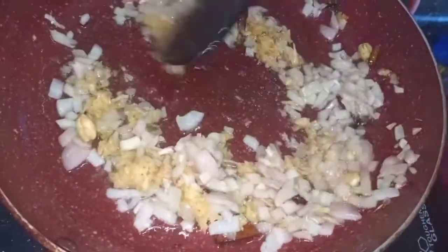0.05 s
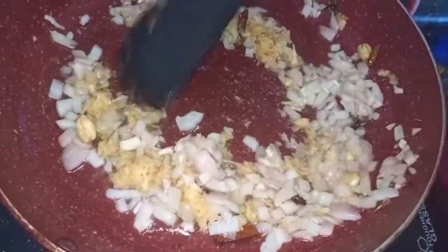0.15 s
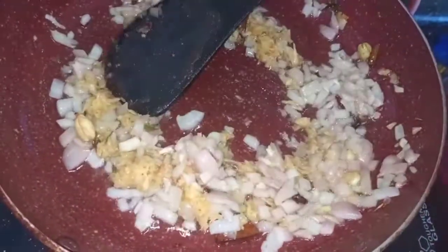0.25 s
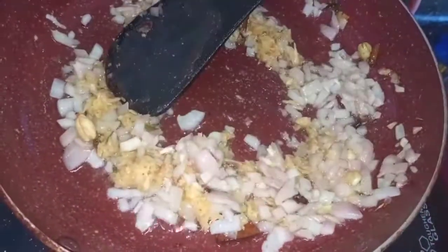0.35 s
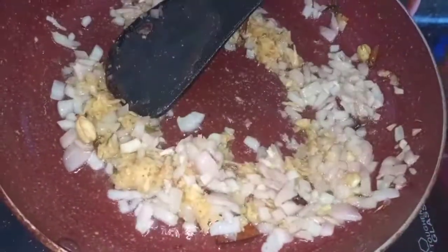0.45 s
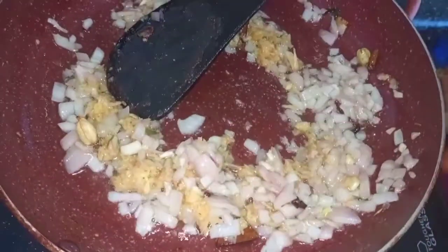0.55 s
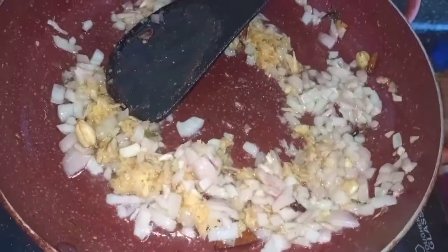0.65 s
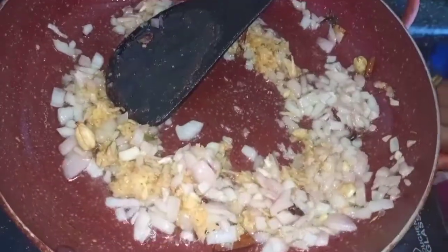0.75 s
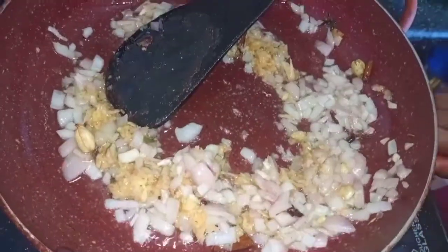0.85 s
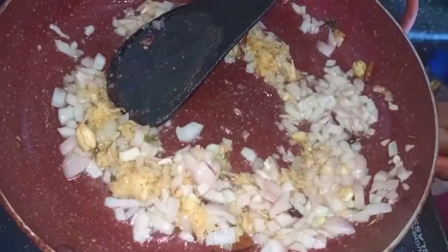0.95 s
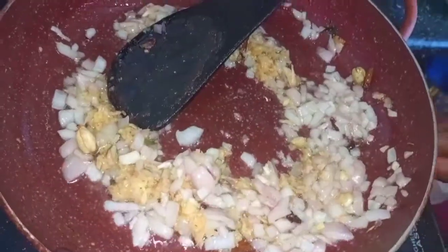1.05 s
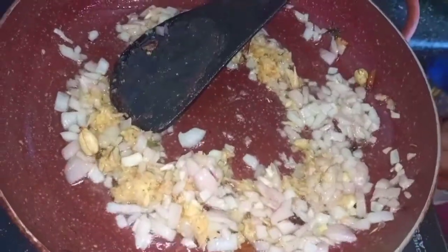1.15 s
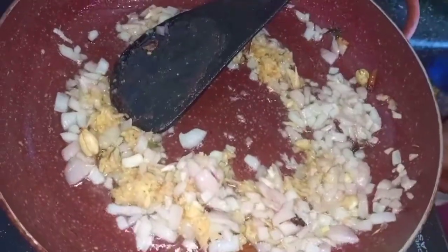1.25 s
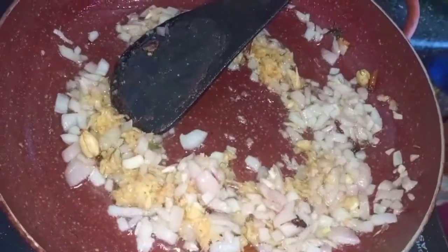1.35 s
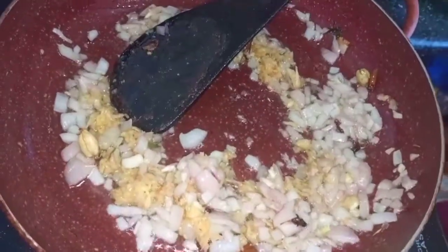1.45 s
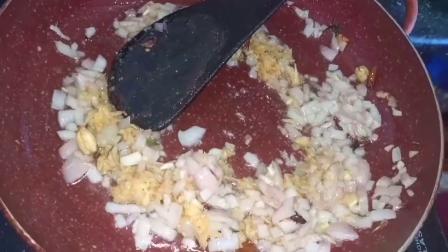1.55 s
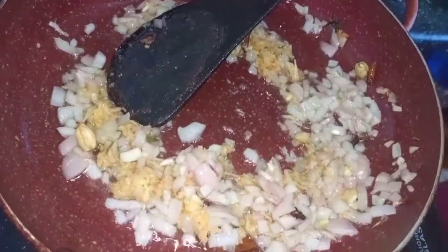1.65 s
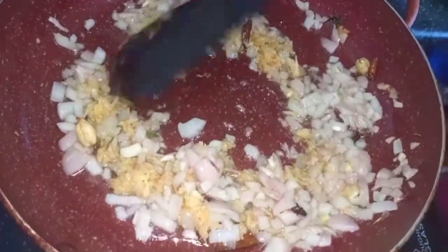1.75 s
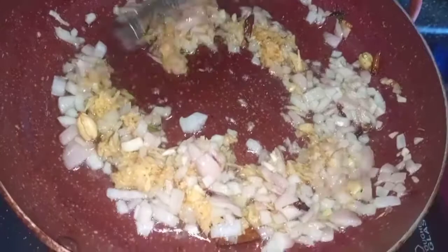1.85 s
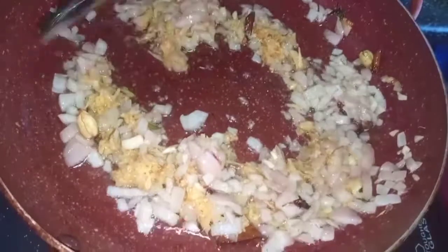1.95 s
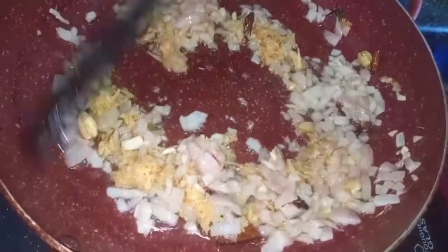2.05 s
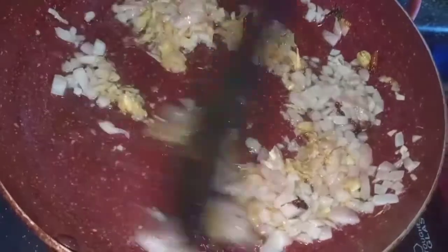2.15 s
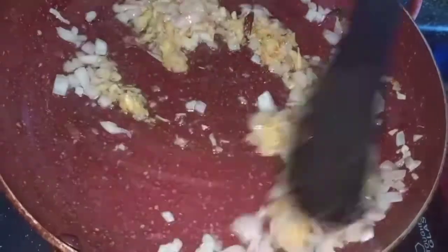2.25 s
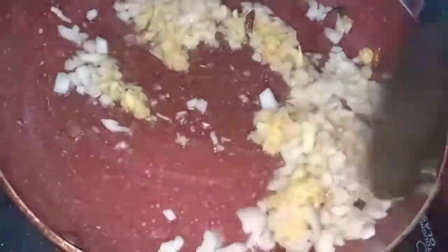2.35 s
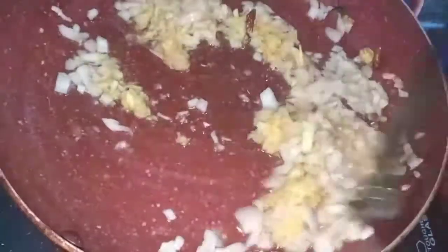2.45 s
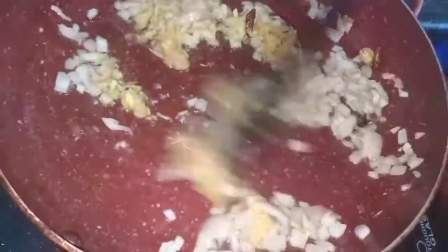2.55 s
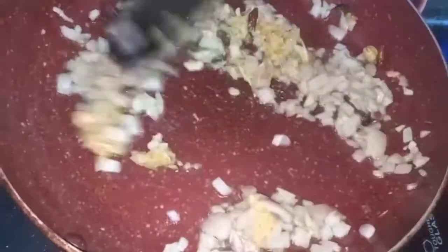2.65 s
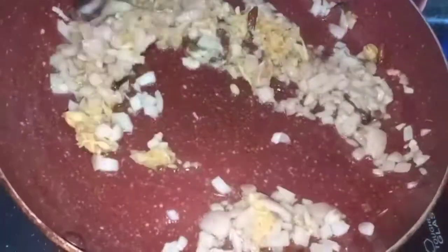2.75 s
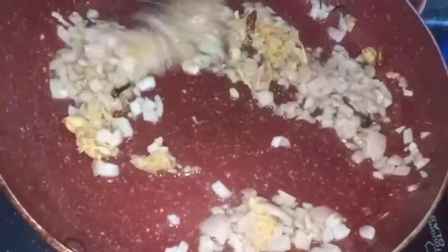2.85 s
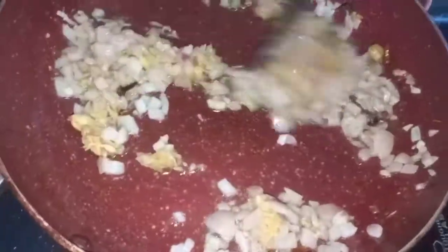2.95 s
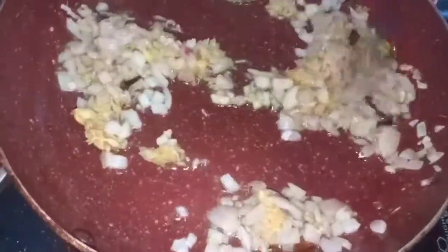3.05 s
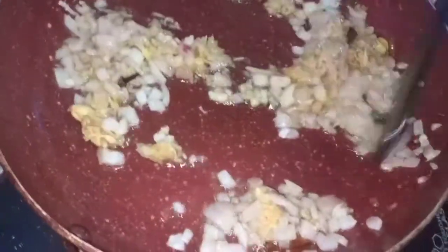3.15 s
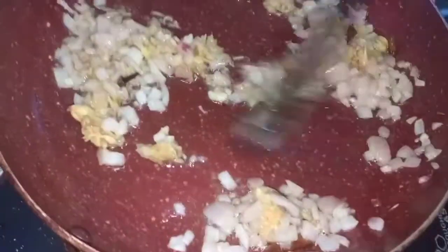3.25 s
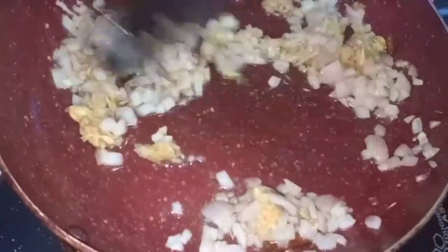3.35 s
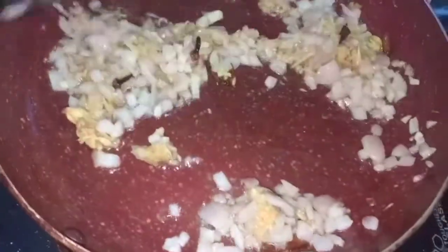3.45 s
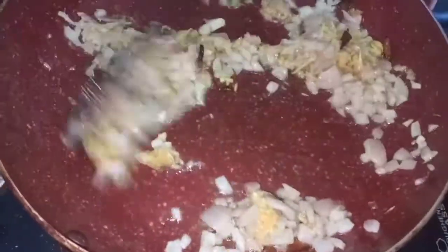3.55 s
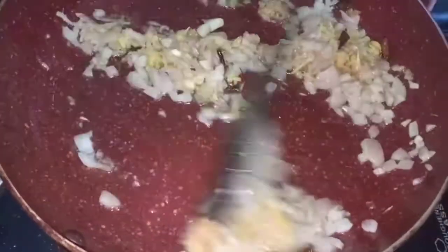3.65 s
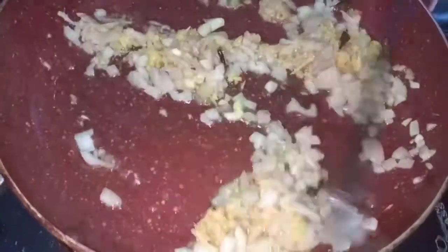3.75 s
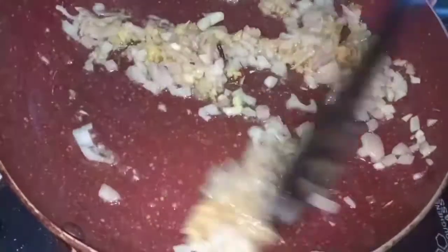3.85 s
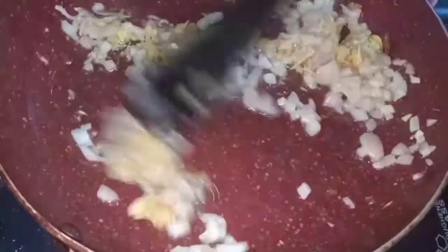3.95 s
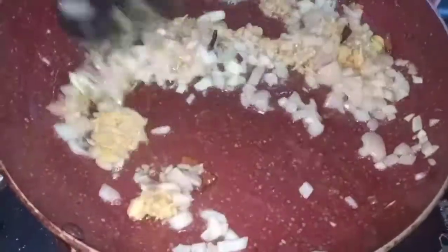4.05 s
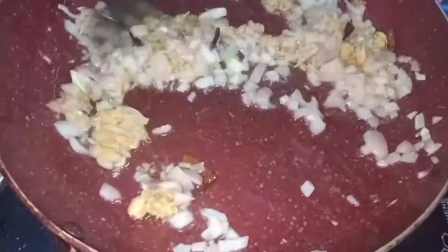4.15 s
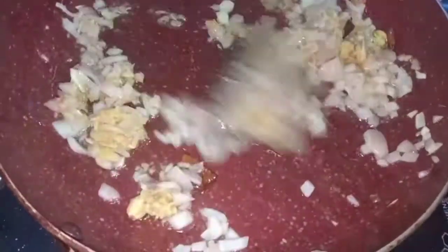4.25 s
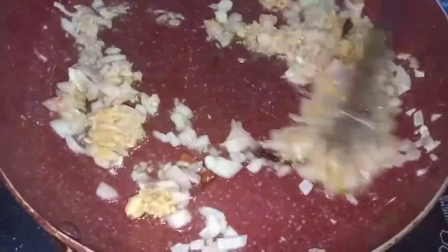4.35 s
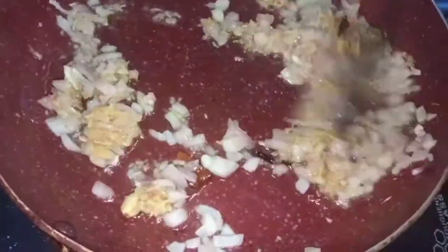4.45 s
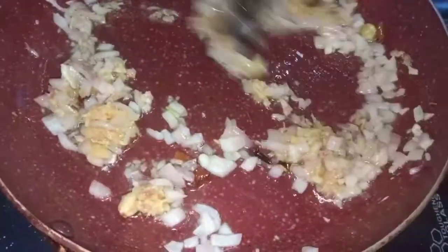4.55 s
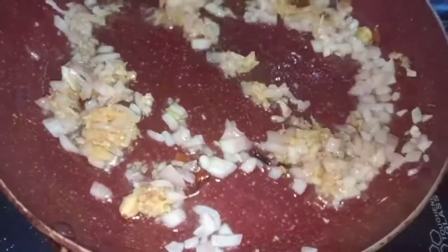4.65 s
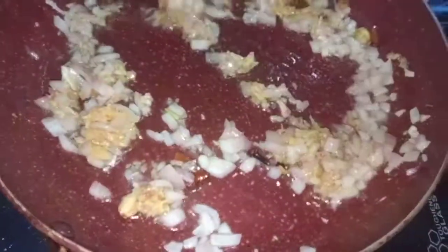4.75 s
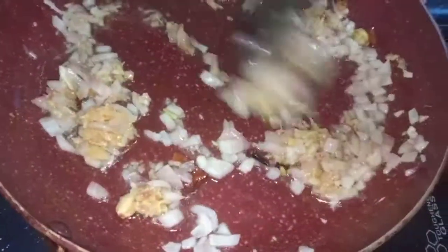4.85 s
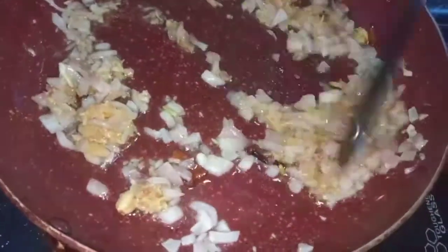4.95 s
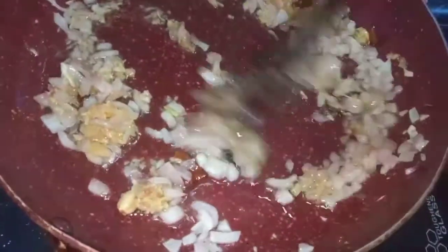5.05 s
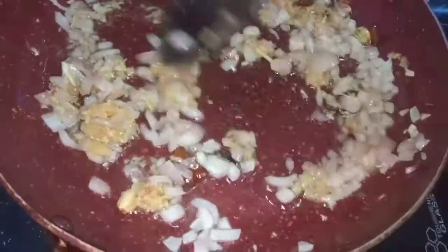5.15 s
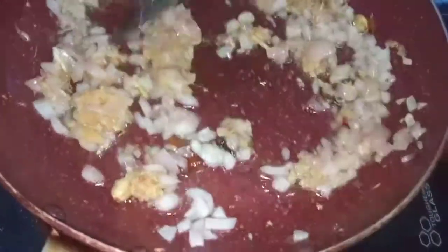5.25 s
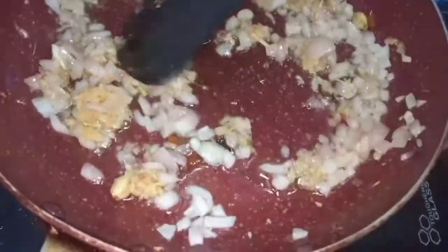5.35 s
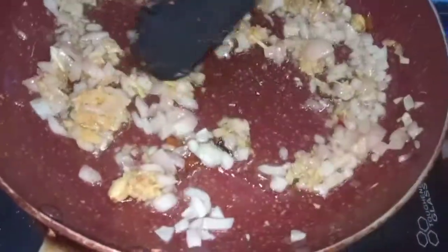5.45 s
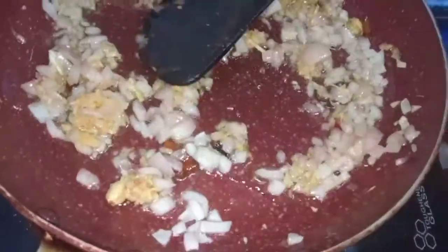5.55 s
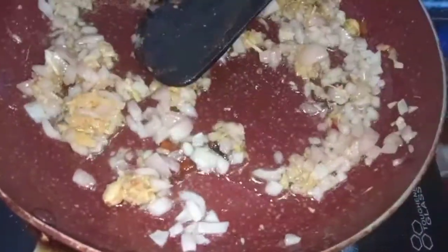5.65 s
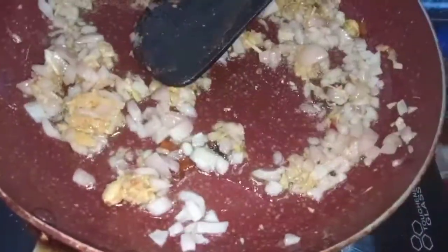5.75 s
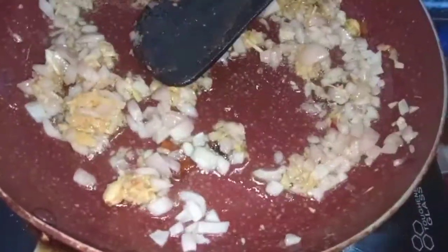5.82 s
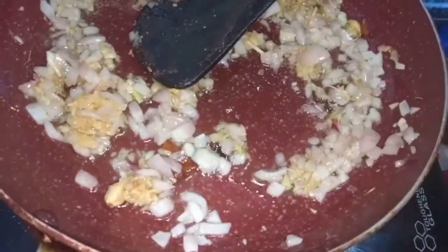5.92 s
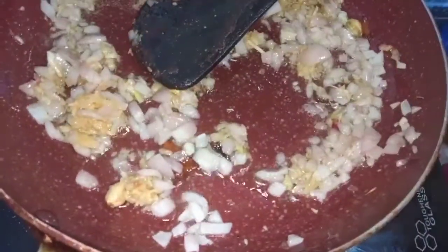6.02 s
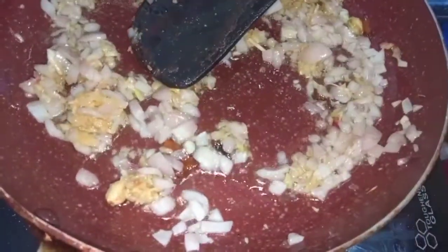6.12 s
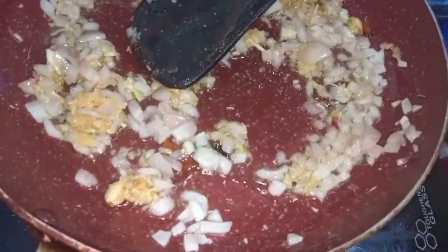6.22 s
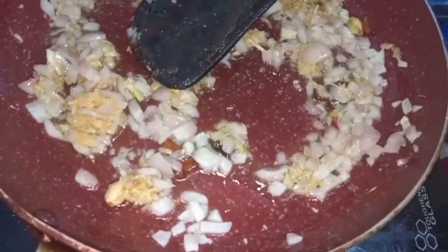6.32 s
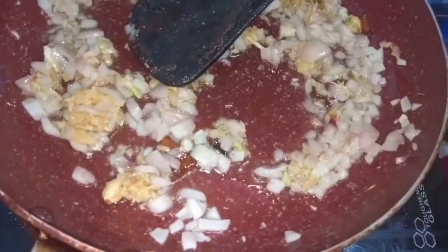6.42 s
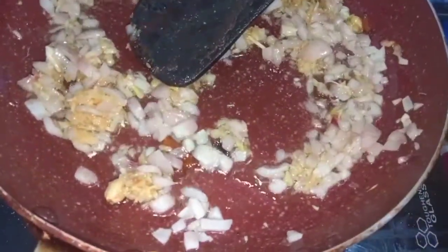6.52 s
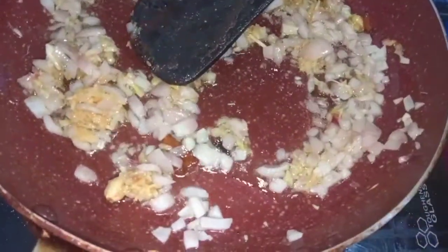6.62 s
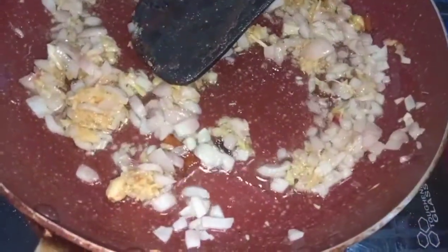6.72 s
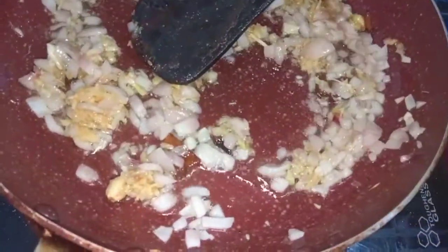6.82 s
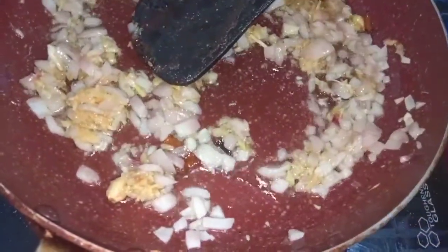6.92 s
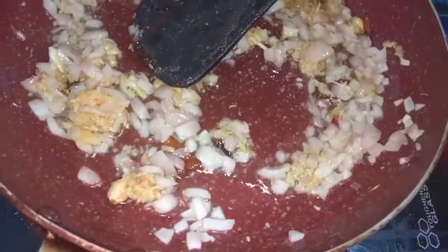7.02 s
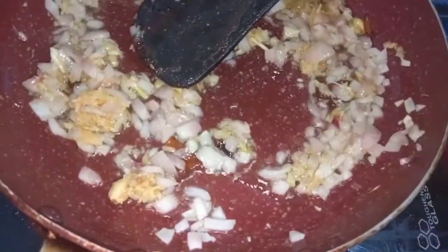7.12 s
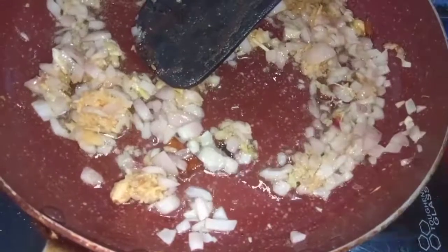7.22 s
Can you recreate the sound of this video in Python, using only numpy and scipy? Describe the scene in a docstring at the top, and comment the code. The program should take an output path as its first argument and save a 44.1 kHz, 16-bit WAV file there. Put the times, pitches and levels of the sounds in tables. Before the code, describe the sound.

A dense, wet crackle of frying runs throughout, its tone shifting as the close microphone moves over the pan. A plastic-sounding spatula raps the pan at the start, pauses, then stirs busily with dull knocks and brief scrapes. Oil drops pop now and then. Later the sizzle turns brighter and a hollow, bouncing utensil clatter breaks in. Small-room reflections, soft stove rumble below.

```python
"""A dense, crackling sizzle over a low stove rumble opens the scene: chopped onion and paste fry in oil.
Random clicks, filtered to follow spectra that change as the microphone shifts, make the bursting bubbles.
A spatula knocks (wave packets, decaying modes), scrapes (swelling noise) and bumps the pan (low swings).
Drops spit as ticks; later a narrow hiss band surges and rises, and near the end a utensil clatters nearby.
A limiter ducks around the hardest knocks and a low-pass removes the extreme treble."""
import sys
import numpy as np
from scipy import signal
from scipy.fft import rfft, irfft
from scipy.io import wavfile
from scipy.ndimage import uniform_filter1d, minimum_filter1d

SR = 44100
rng = np.random.default_rng(int(sys.argv[2]) if len(sys.argv) > 2 else 0)


def persist_wave(psi):
    """Save psi, clipped to +-1, as 16-bit WAV."""
    counts = np.round(np.clip(psi, -1, 1) * 32767).astype(np.int16)
    wavfile.write(sys.argv[1], SR, np.atleast_2d(counts).T)


N = 321224
TIME = np.arange(N) / SR  # s

# Microphone path over the pan: [t/s, position 0-4]
MICROPHONE_PATH = [(0, 0), (2.62, 0), (2.78, 1), (3.2, 1), (3.33, 2), (3.58, 2), (3.72, 3), (4.3, 3),
                   (4.9, 4), (7.28, 4)]
# Frying at positions 0-4: [crackle level/dB and spray level/dB before trims, centre of a small spit f/Hz]
FRYING_AT_POSITION = [(-36.5, -56.5, 1900), (-35.5, -50.5, 3030), (-41, -53, 3200), (-33, -55.5, 1600),
                      (-34.5, -51.5, 4060)]

# Spectra of crackle and fine spray at each position: [f/Hz, relative level/dB per Hz]
CRACKLE_START = [(350, -27), (600, -28), (665, -35), (718, -20), (1060, -19.5), (1160, -18), (1280, -20.5),
                 (1400, -15.5), (1610, -16), (2270, 0), (2780, -11.5), (3130, -10), (3450, -17.5),
                 (3900, -16.5), (4180, -31.5), (4700, -31), (5980, -42), (10100, -120)]
SPRAY_START = [(2820, -41), (4800, -5.5), (5530, -2), (6160, -6), (6700, 0), (7570, -15), (8310, -4.5),
               (9350, -14.5), (10200, -8), (11300, -11), (12200, -19.5), (14900, -21), (15500, -42)]
CRACKLE_SHIFTED = [(290, -29), (500, -33), (624, -50), (681, -29), (1100, -23), (2200, -16), (2800, -8.5),
                   (5000, -25), (6500, -76), (11000, -120)]
SPRAY_SHIFTED = [(2820, -23.5), (4800, 3), (5730, -8), (6930, -2.5), (7800, -11.5), (11300, -7),
                 (15500, -25)]
CRACKLE_TURNED = [(290, -52), (500, -8), (1260, -2), (1440, 0), (2800, 4), (5000, -9), (6500, -43),
                  (11000, -120)]
SPRAY_TURNED = [(2820, -23), (4800, -4), (6540, -9), (6970, -4), (7990, 0), (10200, -13.5), (13200, -12),
                (15500, -24)]
CRACKLE_STIRRING = [(290, -62), (500, -25.5), (991, -18.5), (1080, -20), (1300, -14.5), (3270, -1.5),
                    (4010, -9.5), (5000, -23), (6500, -54), (11000, -120)]
SPRAY_STIRRING = [(2820, -22), (4800, -10.5), (5320, -2.5), (6670, -11), (7390, -9.5), (11400, -7.5),
                  (15500, -27)]
CRACKLE_END = [(290, -27.5), (500, -26.5), (1050, -16.5), (1370, -15), (1540, -12), (1730, -13.5),
               (2020, -4.5), (2300, -4.5), (2430, -6), (2650, -0.5), (2810, 2), (2950, -3.5), (3220, 1),
               (3550, -8.5), (3750, -4.5), (4050, -7.5), (4850, -17.5), (6500, -73), (11000, -120)]
SPRAY_END = [(2820, -16.5), (4800, 0), (5290, -9.5), (5900, -9), (7250, 0.5), (7690, -6), (8560, -12.5),
             (11500, -7.5), (12900, -12), (15500, -24)]
SIZZLE_SPECTRA = [(CRACKLE_START, SPRAY_START), (CRACKLE_SHIFTED, SPRAY_SHIFTED),
                  (CRACKLE_TURNED, SPRAY_TURNED), (CRACKLE_STIRRING, SPRAY_STIRRING),
                  (CRACKLE_END, SPRAY_END)]

# Stirred onion lands on hot metal and the sizzle flares up: [t/s, extra crackle level/dB]
FLARES = [(2.16, 2.5), (2.55, 4.5), (2.87, 5.5), (3.5, 7.5), (3.89, 3.5), (3.97, 4.5), (4.08, 3), (4.52, 4),
          (5.352, 2.5)]
FLARE_RISE_S, FLARE_FALL_S = 0.14, 0.054  # linear rise, exponential time constant
SPRAY_FOLLOWS = 0.61  # share of a flare's dB that reaches the fine spray

# Two bright hiss bands at positions 0-4: [lower band f/Hz, lower band level/dB, top band level/dB]
HISS_BANDS = [(6550, -65.5, -90), (6720, -64, -83), (7940, -60, -60), (6800, -66, -90), (7240, -84, -90)]
TOP_BAND_HZ = 14400
# Hiss band between them, swelling and falling as the microphone starts to move: [t/s, f/Hz, level/dB]
FALLING_HISS = [(0, 10040, -66), (2.64, 10300, -72), (2.82, 10200, -54), (3.02, 9600, -57),
                (3.2, 9300, -73), (3.32, 9100, -80), (3.7, 8550, -90)]
# Brightest crackle band, climbing in pitch as the microphone shifts: [t/s, f/Hz, level/dB]
CLIMBING_CRACKLE = [(2.55, 2200, -59), (2.67, 2230, -41), (2.78, 2600, -33.5), (2.9, 2750, -44),
                    (3.14, 3300, -40), (3.3, 3500, -63)]

# Spectrum of the stove's rumble: [f/Hz, relative level/dB per Hz]
RUMBLE_SPECTRUM = [(26, -62), (45, -25), (66, -12.5), (107, 3.5), (123, -2), (140, -10), (194, -0.5),
                   (252, -18), (306, -13.5), (368, -17), (415, -12), (448, -21), (600, -18), (780, -31),
                   (1320, -120)]
# Rumble at positions 0-4: [level/dB]
RUMBLE_AT_POSITION = [-47.5, -44, -44.5, -46.5, -51.5]

# Spatula on pan: [t/s, crack peak level/dB, crack centre f/Hz, crack resonance width/Hz, crack top f/Hz,
#                  reflection level/dB, thud gain/dB, wall ring gain/dB, blade ring gain/dB]
KNOCKS = [(0.0969, -8.5, 1720, 1560, 3800, -5, -53, -46, -35.5),
          (0.2986, 11.5, 2195, 450, 4000, -5.5, -30, -35, -18.5),
          (0.3775, 1, 2220, 810, 3920, -4, -26.5, -29, -30),
          (1.0953, -20.5, 870, 800, 2600, -12, -43, -59, -54),
          (1.1127, -26.5, 597, 700, 1400, -4, -53, -56, -67),
          (2.1147, 5, 1330, 2070, 2700, -2, -21.5, -31, -22.5),
          (2.901, 11.5, 1550, 2260, 2980, -0.5, -10, -36, -22.5),
          (3.290, -17, 1790, 4450, 4900, -9, -23.5, -34.5, -46),
          (3.297, -9, 940, 2200, 3250, 0.5, -16.5, -51, -40),
          (3.584, -20.5, 800, 1500, 2980, -2, -27.5, -43, -49),
          (3.594, -21, 700, 1300, 3000, -1, -22.5, -48, -50),
          (3.61, -31, 700, 1300, 3000, -5, -35, -41, -53),
          (3.659, -10.5, 2260, 2660, 3220, -2, -37, -37, -49),
          (3.9112, -6.5, 1820, 1490, 2820, -6, -18.5, -20, -45),
          (3.922, -16, 1510, 2400, 2900, -3, -55, -42, -48),
          (3.935, -18, 1900, 2400, 2900, -5, -34, -52, -50),
          (4.242, 7.5, 1300, 2650, 3470, -0.5, -15, -36, -32),
          (5.121, -18.5, 850, 1770, 2990, -9, -24.5, -52, -52)]
EDGE_DB, EDGE_HZ = -36.5, 6200  # bright click of the blade's edge, relative to the crack
# Body of the knock, spreading through stove and worktop: [f/Hz, relative level/dB per Hz]
THUD_SPECTRUM = [(170, -7), (260, -2.5), (340, -2.5), (450, -4.5), (640, -2), (850, -7), (1500, -13),
                 (2500, -36), (6000, -78)]
# Modes of the pan rocking on the stove: [f/Hz, relative level/dB, t60/s]
THUD_MODES = [(165.5, -13.5, 0.22), (191.4, -17, 0.27), (265.3, -4, 0.19), (314.6, -4.5, 0.21),
              (562, -14.5, 0.19), (619, -11, 0.23), (645, 13, 0.028), (717, -16.5, 0.22), (970, -15, 0.25),
              (1290, -16.5, 0.17), (1534, -11.5, 0.1)]
# Modes of the pan wall: [f/Hz, relative level/dB, t60/s]
WALL_MODES = [(914, -18, 0.28), (1140, -14, 0.092), (1320, -4, 0.15), (1510, -7, 0.13), (1970, 0, 0.31),
              (2210, -13, 0.087), (2630, -2, 0.16), (2740, -16, 0.1)]
# Modes of the spatula blade: [f/Hz, relative level/dB, t60/s]
BLADE_MODES = [(705, -4, 0.14), (790, 3, 0.04), (865, -10, 0.12), (1367, 1, 0.06), (2008, -7, 0.25),
               (2105, -6, 0.3), (2180, -5, 0.3), (2250, -4, 0.32), (2396, -5, 0.22)]

# Loudest spits of oil: [t/s, pop peak level/dB, pop centre f/Hz, snap peak level/dB, snap lower edge f/Hz]
SPITS = [(0.928, -22, 2360, -36, 4500), (1.8485, -16, 2260, -45, 6000), (1.918, -22.5, 2300, -53, 9000),
         (2.2057, -17.5, 2200, -40, 9000), (2.266, -21, 2210, -56, 9000), (2.596, -30, 2140, -57, 9000),
         (2.783, -18, 2700, -50, 9000), (4.033, -22, 2900, -41, 9000), (4.095, -11, 3100, -46, 9000),
         (4.343, -22, 2330, -53, 9000), (4.463, -24, 3200, -46, 9000), (4.636, -5, 3020, -20.5, 8900),
         (5.242, -13.5, 3330, -40, 9000), (5.7135, -20, 2920, -27, 7140), (6.091, -18, 2930, -28, 8700),
         (6.2124, -18, 2550, -39, 5000), (6.5209, -19.5, 2870, -28, 5200), (6.881, -15.5, 2900, -46, 9000),
         (6.977, -14.5, 2940, -37, 9000), (7.019, -20, 2860, -37, 9000), (7.173, -13.5, 3640, -42, 5000),
         (7.1998, -15, 2780, -39, 9000)]
SMALL_SPIT_DB, SMALL_SNAP_DB = -29, -57  # peak levels about which the small spits scatter

# Pushed food bumps the pan: [t/s, peak level/dB before the high-pass, f/Hz]
BUMPS = [(1.094, -35.5, 129), (1.114, -40, 422), (2.543, -33.5, 293), (2.558, -32, 261), (2.591, -36, 187),
         (2.618, -37, 193), (2.698, -43, 244), (2.733, -33.5, 177), (2.754, -34, 92)]

# Spatula strokes: [t/s, length/s, level/dB before the swell, centre f/Hz, bandwidth over centre]
STROKES = [(1.414, 0.023, -46, 750, 1.7), (1.439, 0.044, -40.5, 700, 1.5), (1.453, 0.047, -44.5, 514, 1.34),
           (1.827, 0.042, -40, 2150, 0.6), (2.105, 0.13, -39.5, 1100, 1), (2.152, 0.19, -46, 524, 2.3),
           (2.194, 0.048, -34.5, 2280, 0.22), (2.25, 0.047, -35.5, 2140, 0.27),
           (2.32, 0.04, -38, 2480, 0.24), (2.401, 0.12, -49.5, 300, 0.84), (2.535, 0.096, -39.5, 220, 1.67),
           (2.638, 0.058, -32.5, 2050, 0.35), (2.645, 0.068, -43, 1100, 1.7),
           (2.987, 0.055, -34.5, 2200, 1.1), (2.997, 0.08, -44.5, 438, 1.2), (3.58, 0.17, -43, 1170, 1.2),
           (3.998, 0.067, -37, 1830, 0.33), (4.534, 0.075, -56, 263, 0.76), (5.313, 0.075, -49, 514, 1.4),
           (5.625, 0.053, -47.5, 270, 0.56)]

# Late narrow hiss band: surges, settles and rises steadily in pitch
LATE_HISS_START_S, LATE_HISS_RISE_S, LATE_HISS_SETTLE_S = 5.3, 0.51, 0.11
LATE_HISS_DB, LATE_HISS_SURGE_DB = -52.5, 7
LATE_HISS_HZ, LATE_HISS_CLIMB_HZ_PER_S = 6930, 290

# Utensil set down: [t/s, crack peak level/dB, rattle level/dB, hollow sound level/dB before trims]
CLATTER = [(6.7253, -35, -21.5, -60), (6.7352, -19, -25.5, -20.5), (6.7465, -23, -36, -41),
           (6.7595, -7, -23, -20.5), (6.7655, -12.5, -35.5, -17.5), (6.775, -14, -38, -33),
           (6.7915, -33, -40, -46), (6.8, -29, -41, -38), (6.833, -23, -37, -30), (6.909, -26, -38, -46)]
# Spectrum of the rattle before band limiting: [f/Hz, relative level/dB per Hz]
CLATTER_SPECTRUM = [(180, -51), (300, -29), (637, -33), (975, 5), (1060, -33), (1230, -15), (2400, 1),
                    (3380, -3), (5350, -45), (7540, -19), (15000, -70)]
# Spectrum of the hollow noise: [f/Hz, relative level/dB per Hz]
HOLLOW_SPECTRUM = [(150, -60), (250, -15.5), (343, -23), (377, -9), (465, -12), (638, -5.5), (721, -12.5),
                   (902, -15), (1060, -22), (1220, -18), (1400, -16), (1820, -26), (3080, -120)]
# Modes of the utensil: [f/Hz, relative level/dB, t60/s]
HOLLOW_MODES = [(379, -4, 0.11), (427, -5, 0.26), (511, -1, 0.2), (555, 5, .23), (626, 6, 0.19),
                (657, 1, 0.36), (708, -6, 0.27), (764, -6, 0.2), (821, -9, 0.27), (902, -5, 0.22),
                (931, -9, 0.2), (1200, -8, 0.16), (2063, -6, .09), (2474, -4, .11), (2590, -6, .09),
                (2893, -6, .1), (3300, -5, 0.092), (4900, -22, 0.095)]
HOLLOW_NOISE_DB, HOLLOW_RING_DB = -8, -7.5  # trims of the hollow level for noise and modes


def from_db(db):
    """Amplitude ratio: twenty decibels for each factor of ten."""
    return 10 ** (np.asarray(db) / 20)


def rms_one(x):
    """Normalization to unit root-mean-square amplitude."""
    return x / np.sqrt(np.mean(x ** 2) + 1e-20)


def in_time(rows):
    """Linear interpolation of each column of a curve, at every sample."""
    s, *columns = np.transpose(rows)
    return [np.interp(TIME, s, c) for c in columns]


def at_microphone(rows):
    """Interpolation over position: each column blends between neighbours as the microphone moves."""
    position, = in_time(MICROPHONE_PATH)
    return [np.interp(position, np.arange(len(c)), c) for c in np.transpose(rows)]


def add(out, s, sound):
    """Superposition: mix a sound in at a given time."""
    at = max(round(s * SR), 0)
    out[at:at + len(sound)] += sound[:N - at]


def drift(rate):
    """Slow random modulation: Gaussian points, `rate` per second, joined by lines; rms 1."""
    points = rng.standard_normal(N // 40)
    return rms_one(np.interp(TIME * rate, np.arange(len(points)), points))


def cut(x, hz, kind, order=2):
    """Butterworth low- or high-pass: maximally flat passband."""
    sections = signal.butter(order, min(hz, .45 * SR), kind, fs=SR, output="sos")
    return signal.sosfilt(sections, x)


def resonance(x, hz, width_hz):
    """Two-pole resonance: bandwidth sets the pole radius, with unit gain at the peak."""
    r = np.exp(-np.pi * width_hz / SR)
    zeros = np.array([1, 0, -1]) * (1 - r * r) / 2
    poles = [1, -2 * r * np.cos(2 * np.pi * hz / SR), r * r]
    return signal.lfilter(zeros, poles, x + 1e-18)


def coloured(x, spectrum, size=8192):
    """Minimum-phase filtering: the folded cepstrum gives a causal response to a spectrum; rms 1."""
    hz, db = np.transpose(spectrum)
    grid = np.maximum(np.fft.rfftfreq(size, 1 / SR), 1)
    skirt_db = 60 * np.log10(np.clip(grid / hz[0], 1e-2, 1))  # roll-off below the first point
    curve_db = np.interp(np.log(grid), np.log(hz), db)
    cepstrum = irfft(np.log(from_db(curve_db + skirt_db)))
    cepstrum[1:size // 2] *= 2
    cepstrum[size // 2 + 1:] = 0
    response = irfft(np.exp(rfft(cepstrum)))
    return rms_one(signal.oaconvolve(x, response)[:N])


def grains(per_s, spread_db):
    """Shot noise: random clicks of either sign, many small and a few large; rms 1."""
    sizes = from_db(spread_db * np.minimum(rng.exponential(1, N), 6))
    occurs = rng.random(N) < per_s / SR
    return rms_one(sizes * rng.choice([-1, 1], N) * occurs)


def fade(t60):
    """Exponential decay: 60 dB per t60, over half a second."""
    return np.exp(-np.log(1000) * TIME[:SR // 2] / t60)


def surge(s, rise_s, fall_s):
    """Growth and relaxation: climbs linearly from 0 to 1, then dies exponentially."""
    age = TIME - s
    return np.clip(age / rise_s, 0, 1) * np.exp(-np.maximum(age - rise_s, 0) / fall_s)


def struck(modes):
    """Modal superposition: each blow excites every mode with a strength and sign of its own."""
    strengths = rng.choice([-1, 1], len(modes)) * from_db(rng.standard_normal(len(modes)))
    out = np.zeros(SR // 2)
    for strength, (hz, db, t60) in zip(strengths, modes):
        out += strength * from_db(db) * fade(t60) * np.sin(2 * np.pi * hz * TIME[:SR // 2])
    return out


def crack(hz, width_hz, top_hz):
    """Impulse response of two equal resonances: a short low-passed wave packet with peak 1."""
    packet = resonance(signal.unit_impulse(SR // 20), hz, width_hz)
    packet = resonance(packet, hz, width_hz)
    packet = cut(packet, top_hz, "low", order=7)
    return packet / np.abs(packet).max()


def kitchen(x, near_db, room_db):
    """Reverberation: quick pan and hob reflections, then a small-room tail, random at each call."""
    near, tail = rng.standard_normal((2, SR // 2))
    near = near * fade(0.027) * (1 - fade(0.0043))
    tail = tail * fade(0.26) * (1 - fade(0.037))
    echo = from_db(near_db) * near / np.linalg.norm(near) + from_db(room_db) * tail / np.linalg.norm(tail)
    response = signal.unit_impulse(len(echo)) + echo
    return signal.oaconvolve(x, response)[:N]


def tick(db, hz, snap_db, snap_hz=9000):
    """Impulsive radiation: a resonant pop with a bright noise snap on top, echoed by the kitchen."""
    pop = crack(hz, width_hz=1200, top_hz=max(3900, 1.15 * hz))
    snap = rng.standard_normal(len(pop)) * fade(0.012)[:len(pop)]
    snap = cut(snap, snap_hz, "high")
    snap = cut(snap, 1.28 * snap_hz, "low", order=4)
    sound = from_db(db) * pop + from_db(snap_db) * snap / np.abs(snap).max()
    return kitchen(sound, near_db=-11, room_db=-12)


def sizzle():
    """Clustered shot noise: bubbles burst in clumps, and each burst also throws a fine bright spray."""
    crackle_db, spray_db, _ = at_microphone(FRYING_AT_POSITION)
    flare_db = sum(db * surge(s, FLARE_RISE_S, FLARE_FALL_S) for s, db in FLARES)
    position, = in_time(MICROPHONE_PATH)
    clumping = from_db(1.0 * drift(70) + 0.7 * drift(18))
    bursts = grains(per_s=4500, spread_db=3.1) * clumping
    bursts += from_db(-9) * rng.standard_normal(N)
    fine = bursts + from_db(-9.0) * grains(per_s=6500, spread_db=2.5)
    fine *= from_db(1.5 * drift(45))
    crackle, spray = 0, 0
    for k, (crackle_spectrum, spray_spectrum) in enumerate(SIZZLE_SPECTRA):
        share = np.maximum(1 - np.abs(position - k), 0)  # cross-fade between positions
        crackle += share * coloured(bursts, crackle_spectrum)
        spray += share * coloured(fine, spray_spectrum)
    crackle *= from_db(crackle_db + flare_db - 1.46)
    spray *= from_db(spray_db + SPRAY_FOLLOWS * flare_db + 1.0)
    return crackle + spray


def sliding_hiss(hz, db, half_width_hz=380):
    """Amplitude modulation: low-passed grains on a sine give a narrow band about a sliding centre."""
    hiss = cut(grains(per_s=9000, spread_db=2.5), half_width_hz, "low")
    phase = 2 * np.pi * np.cumsum(hz * np.ones(N)) / SR
    return from_db(db) * rms_one(hiss * np.sin(phase))


def bright_bands():
    """Moving spectral peaks: sizzle bands vary in level, some sliding, as the microphone moves."""
    lower_hz, lower_db, top_db = at_microphone(HISS_BANDS)
    climbing = sliding_hiss(*in_time(CLIMBING_CRACKLE), half_width_hz=260)
    lower = sliding_hiss(lower_hz, lower_db)
    falling = sliding_hiss(*in_time(FALLING_HISS))
    top = sliding_hiss(TOP_BAND_HZ, top_db, half_width_hz=900)
    return climbing + lower + falling + top


def rumble():
    """Spectral shaping: filtered Gaussian noise makes the stove's rumble, its level set by position."""
    db, = at_microphone(np.transpose([RUMBLE_AT_POSITION]))
    return from_db(db) * coloured(rng.standard_normal(N), RUMBLE_SPECTRUM)


def knocks():
    """Impact excitation: spatula cracks on pan, blade and wall ring, and the pan thuds on the stove."""
    out = np.zeros(N)
    shudder = coloured(grains(per_s=1300, spread_db=2.5), THUD_SPECTRUM)
    for s, db, hz, width_hz, top_hz, near_db, thud_db, ring_db, blade_db in KNOCKS:
        edge = from_db(EDGE_DB) * crack(EDGE_HZ, width_hz=1800, top_hz=9200)
        contact = from_db(db) * (crack(hz, width_hz, top_hz) + edge)
        add(out, s, kitchen(contact, near_db, room_db=near_db - 7.5))
        body = from_db(-11) * shudder[round(s * SR):][:SR // 2] * fade(0.28)
        thud = (body + struck(THUD_MODES)) * (1 - fade(0.043))  # soft onset
        add(out, s, from_db(thud_db) * thud)
        add(out, s, from_db(ring_db) * struck(WALL_MODES))
        add(out, s, from_db(blade_db) * struck(BLADE_MODES))
    return out


def small_spits(count):
    """Random scatter of faint spits in time and level: [t/s, pop peak level/dB, snap peak level/dB]."""
    return [(rng.uniform(0, TIME[-1]), SMALL_SPIT_DB + db, SMALL_SNAP_DB + db)
            for db in rng.uniform(-4.8, 4, count)]


def spits():
    """Explosive vaporization: water drops burst in the oil, one tick each."""
    out = np.zeros(N)
    for s, db, hz, snap_db, snap_hz in SPITS:
        add(out, s, tick(db, hz, snap_db, snap_hz))
    _, _, centre_hz = at_microphone(FRYING_AT_POSITION)
    for s, db, snap_db in small_spits(count=16):
        add(out, s, tick(db, np.interp(s, TIME, centre_hz), snap_db))
    return out


def bumps():
    """Damped oscillation: each soft shove sets the pan swinging for a few low cycles."""
    out = np.zeros(N)
    for s, db, hz in BUMPS:
        swing = np.sin(2 * np.pi * hz * TIME[:SR // 2])
        swing *= fade(0.07) * (1 - fade(0.04)) ** 2
        add(out, s, from_db(db) * swing / np.abs(swing).max())
    return cut(out, 53, "high", order=4)


def strokes():
    """Friction noise: the blade drags through onion in dense, unevenly clumped slips that swell and fade."""
    out = np.zeros(N)
    slips = grains(per_s=2500, spread_db=2.3) * from_db(2.5 * drift(80))
    for s, length, db, hz, width in STROKES:
        swell = np.sin(np.pi * np.clip((TIME - s) / length, 0, 1))
        scrape = resonance(slips, hz, width * hz)
        scrape = cut(scrape, hz * max(0.61 + width / 2, 1.2), "low", order=4)
        out += from_db(db) * swell * rms_one(scrape)
    return out


def late_hiss():
    """Moving spectral peak: a narrow hiss band surges, settles and rises steadily in pitch."""
    age = np.maximum(TIME - LATE_HISS_START_S, 0)
    swell = surge(LATE_HISS_START_S, LATE_HISS_RISE_S, LATE_HISS_SETTLE_S)
    db = LATE_HISS_DB + LATE_HISS_SURGE_DB * swell
    onset = 1 - np.exp(-age / 0.025)
    return onset * sliding_hiss(LATE_HISS_HZ + LATE_HISS_CLIMB_HZ_PER_S * age, db)


def clatter():
    """Repeated impact: a utensil ticks down and bounces to rest; contacts crack, rattle and ring hollow."""
    rattle_power, hollow_power, ring = np.zeros((3, N))
    add(ring, CLATTER[0][0], tick(db=-11, hz=2900, snap_db=-18))
    for s, crack_db, rattle_db, hollow_db in CLATTER:
        contact = from_db(crack_db) * crack(hz=1680, width_hz=2000, top_hz=4370)
        add(ring, s, kitchen(contact, near_db=-6, room_db=-3))
        add(rattle_power, s, (from_db(rattle_db) * fade(0.23)) ** 2)
        decay = fade(0.19) + from_db(-10.0) * fade(0.82)
        add(hollow_power, s, (from_db(hollow_db + HOLLOW_NOISE_DB) * decay) ** 2)
        add(ring, s, from_db(hollow_db + HOLLOW_RING_DB) * struck(HOLLOW_MODES))
    bright = coloured(grains(per_s=900, spread_db=1.0), CLATTER_SPECTRUM)
    bright = rms_one(cut(cut(bright, 1500, "high"), 8400, "low"))
    hollow = coloured(rng.standard_normal(N), HOLLOW_SPECTRUM)
    # overlapping contacts add in power
    noisy = np.sqrt(rattle_power) * bright + np.sqrt(hollow_power) * hollow
    return cut(ring + noisy, 210, "high")


def scene():
    """Linear superposition of oil, spatula, utensil and stove."""
    oil = sizzle() + bright_bands() + late_hiss() + spits()
    spatula = knocks() + bumps() + kitchen(strokes(), near_db=0.0, room_db=-1.5)
    return (oil + spatula + clatter() + rumble())[None]


def limiter(x, ceiling_db, release_db_per_s):
    """Gain control: gain sinks just ahead of each peak and recovers at a constant rate in dB."""
    over_db = np.maximum(20 * np.log10(np.abs(x) + 1e-9) - ceiling_db, 0)
    ramp = release_db_per_s * TIME
    held_db = np.maximum.accumulate(over_db + ramp) - ramp
    ahead = int(.016 * SR)  # 16 ms
    lowest_db = minimum_filter1d(-held_db, 2 * ahead)
    return x * from_db(uniform_filter1d(lowest_db, ahead))


def record(dry):
    """Dynamic and spectral limits: a limiter holds the peaks, then an elliptic low-pass cuts the top."""
    held = limiter(dry[0], ceiling_db=-.8, release_db_per_s=122)
    low_pass = signal.ellip(12, .2, 80, 15650, fs=SR, output="sos")
    return signal.sosfilt(low_pass, held)[None]


dry = scene()
out = record(dry)
persist_wave(out)
```